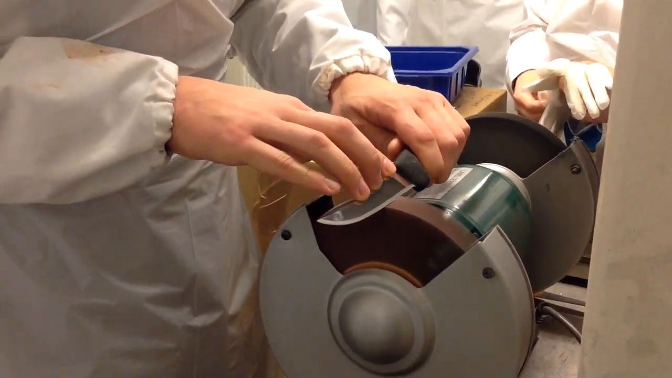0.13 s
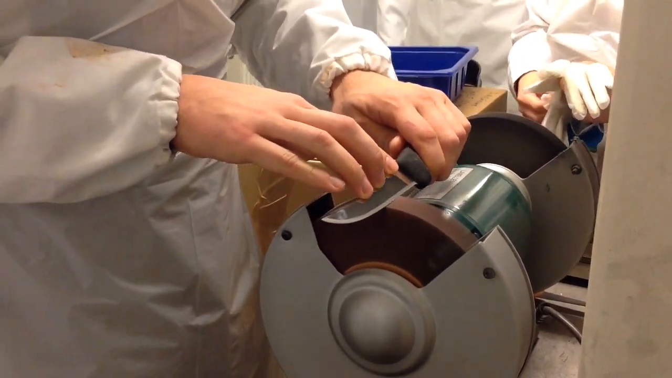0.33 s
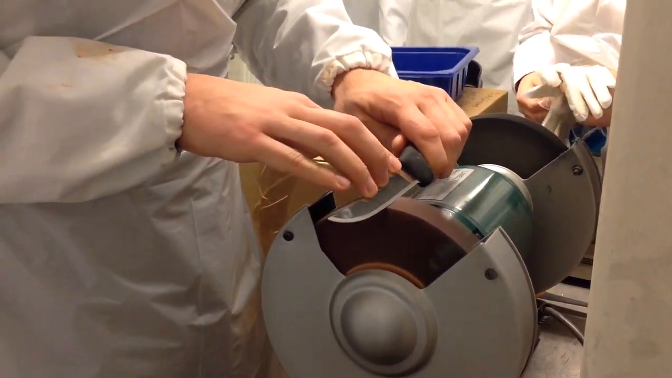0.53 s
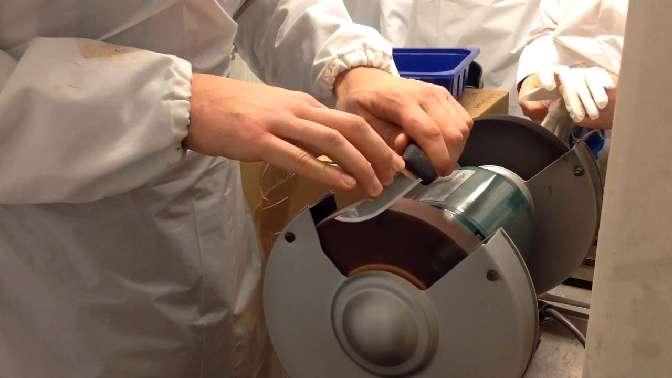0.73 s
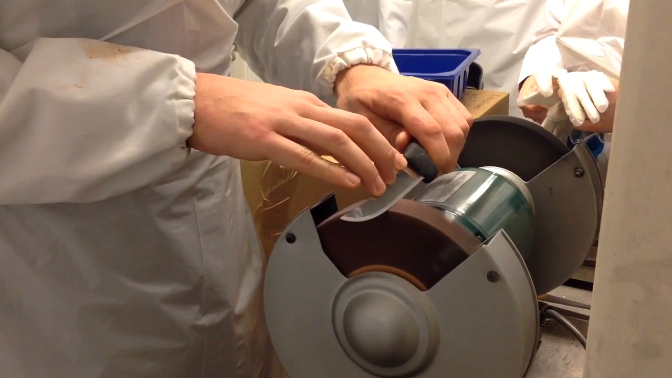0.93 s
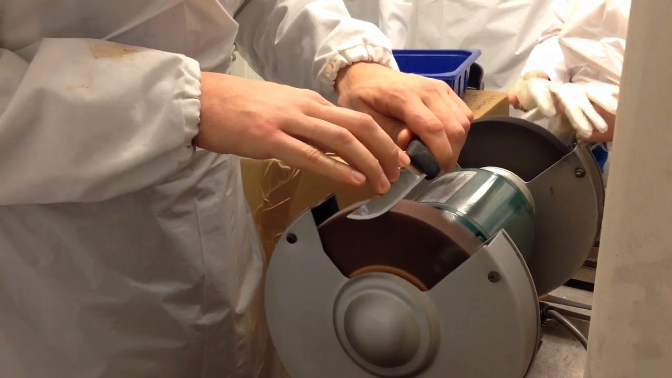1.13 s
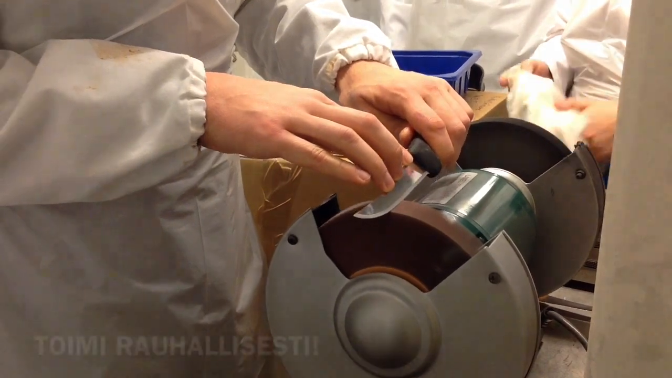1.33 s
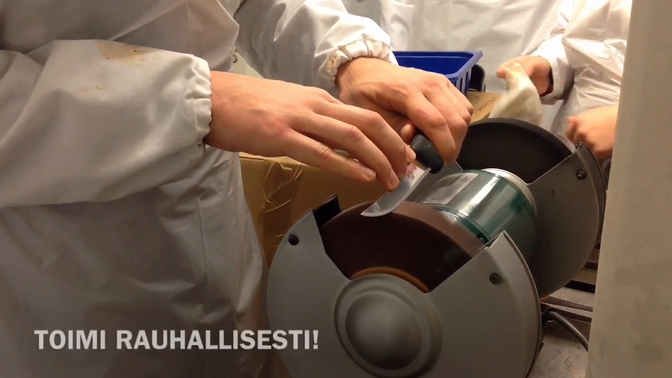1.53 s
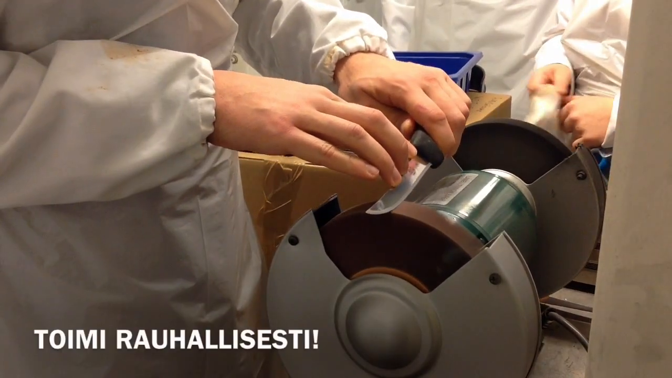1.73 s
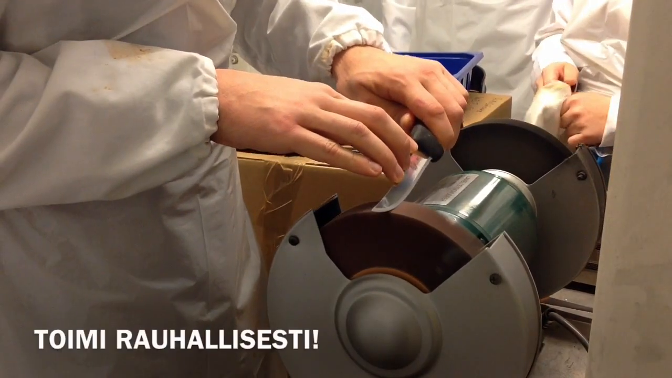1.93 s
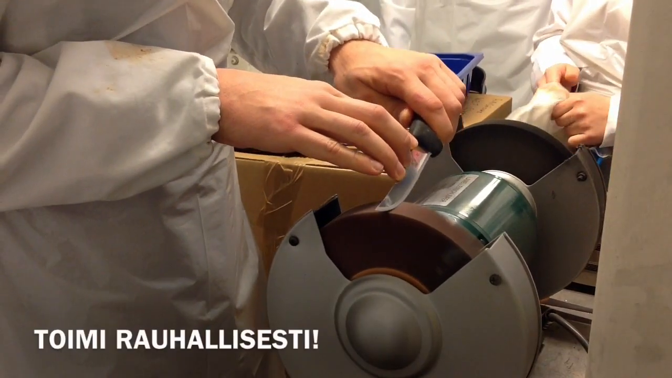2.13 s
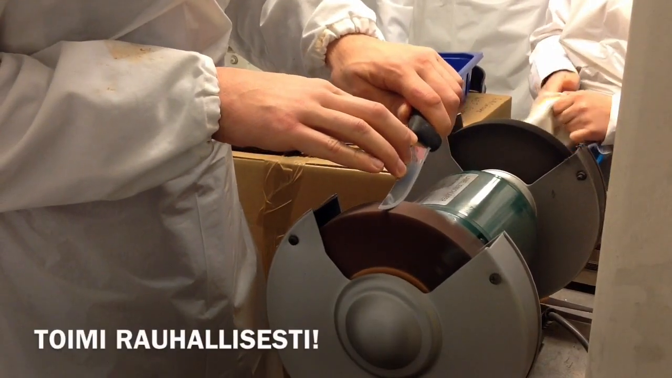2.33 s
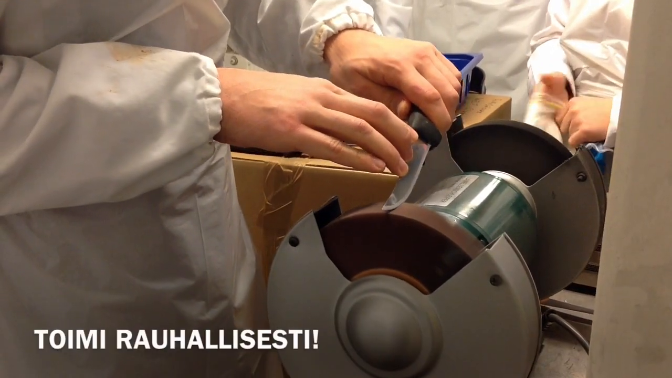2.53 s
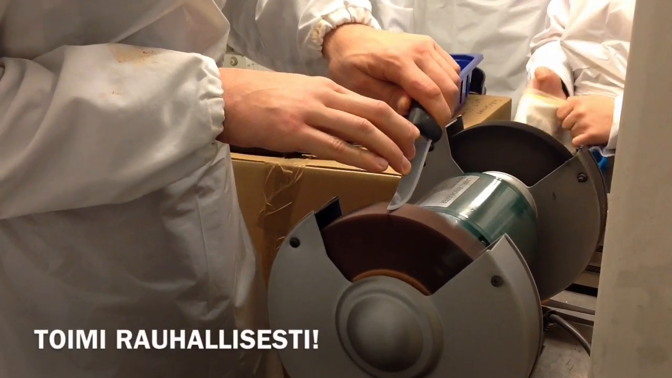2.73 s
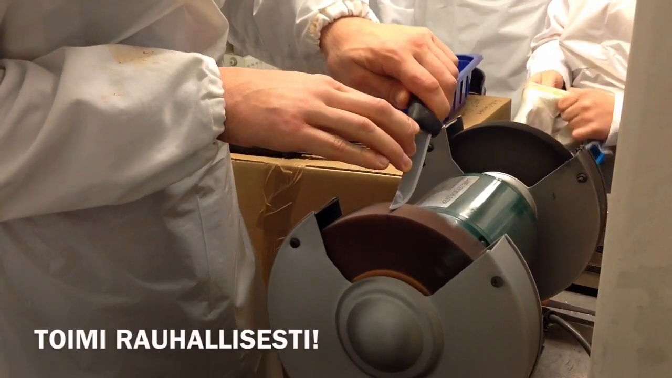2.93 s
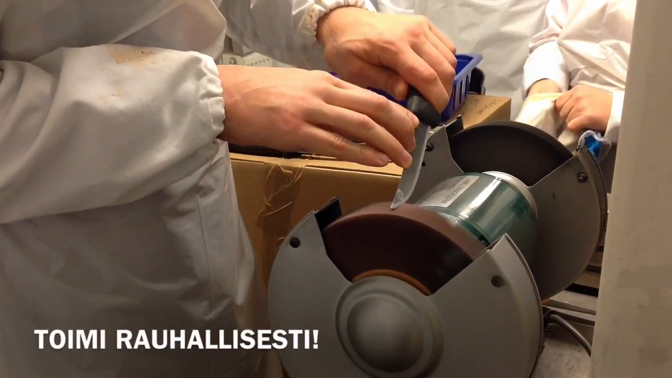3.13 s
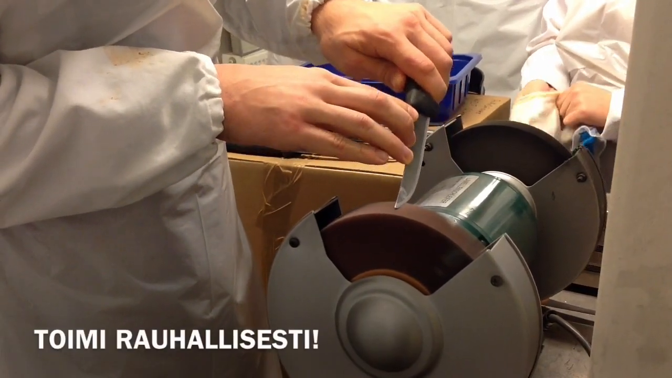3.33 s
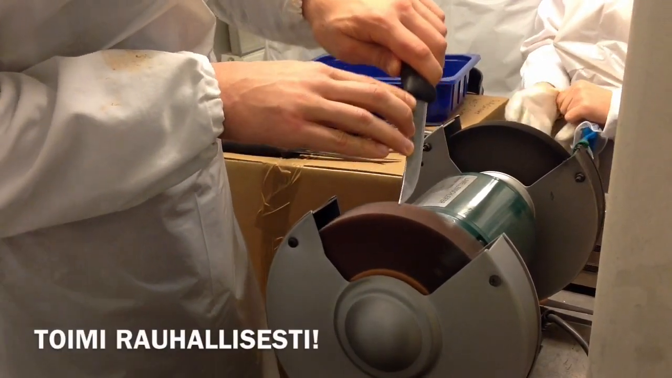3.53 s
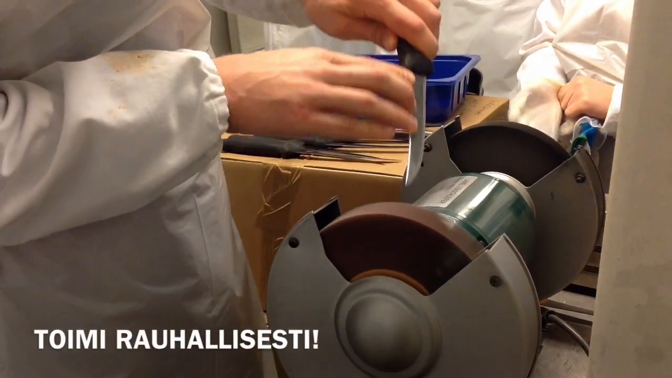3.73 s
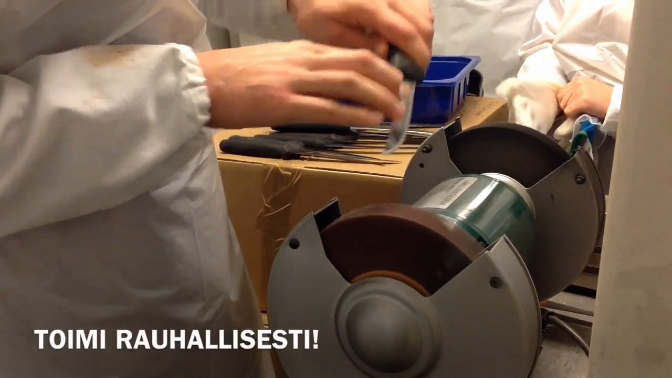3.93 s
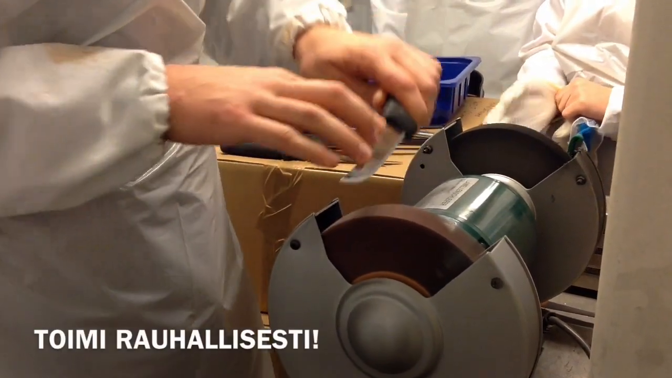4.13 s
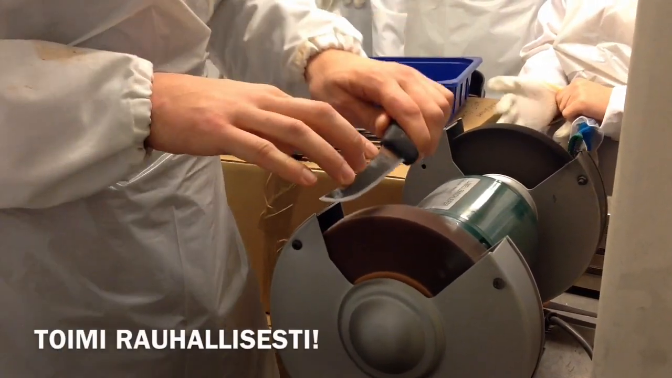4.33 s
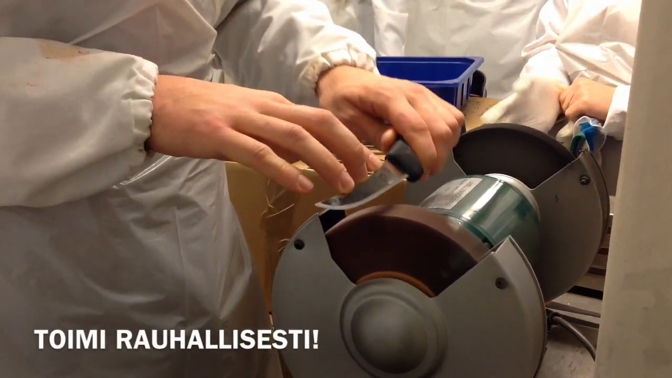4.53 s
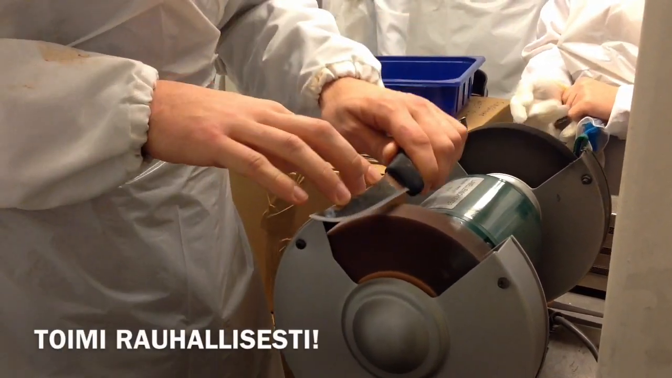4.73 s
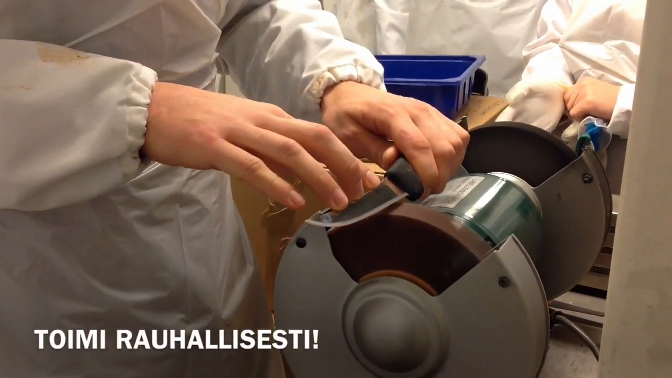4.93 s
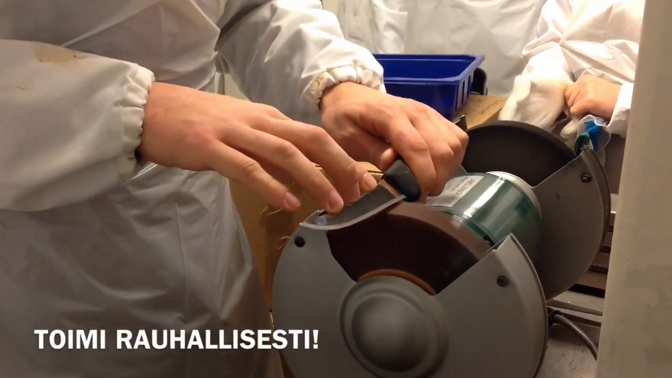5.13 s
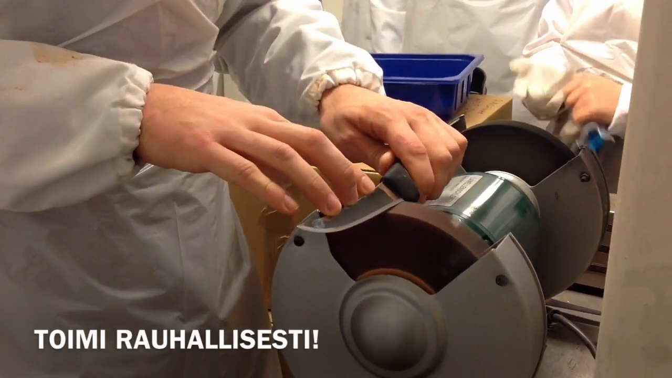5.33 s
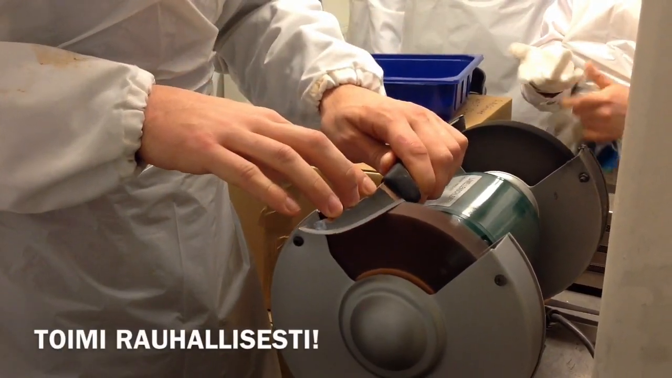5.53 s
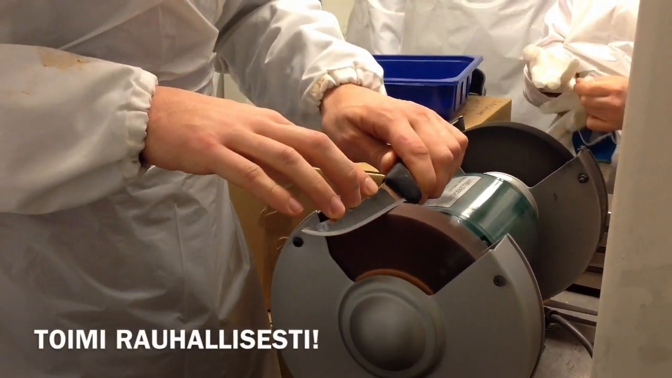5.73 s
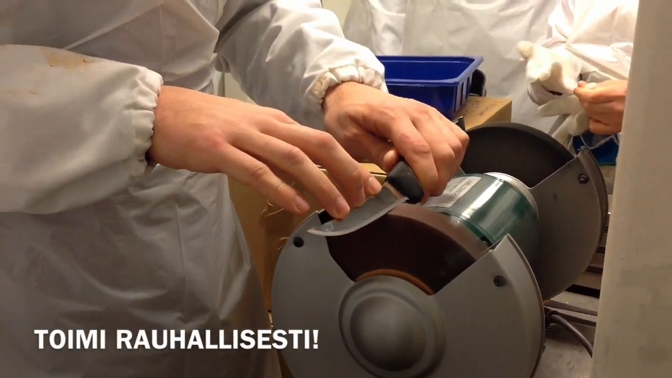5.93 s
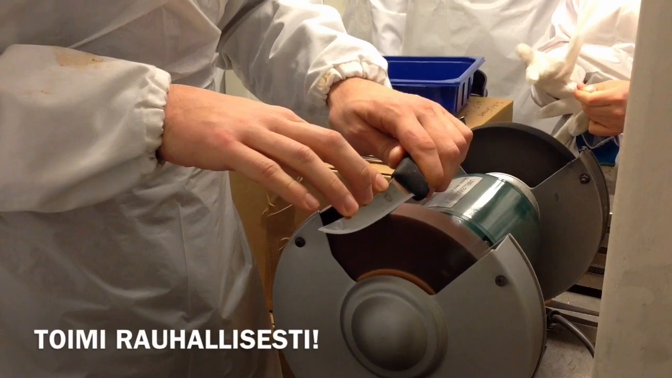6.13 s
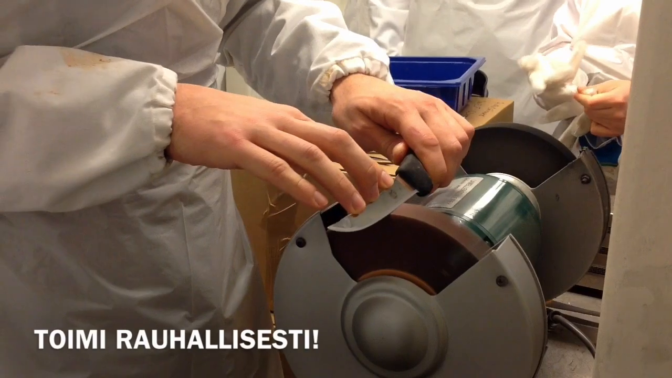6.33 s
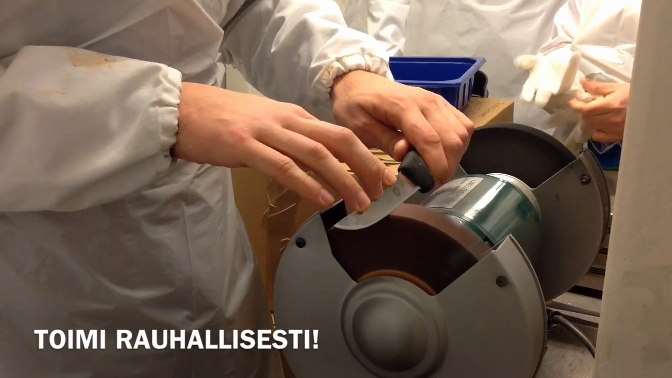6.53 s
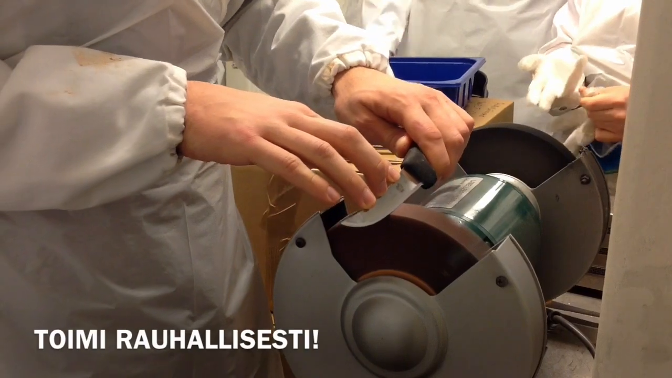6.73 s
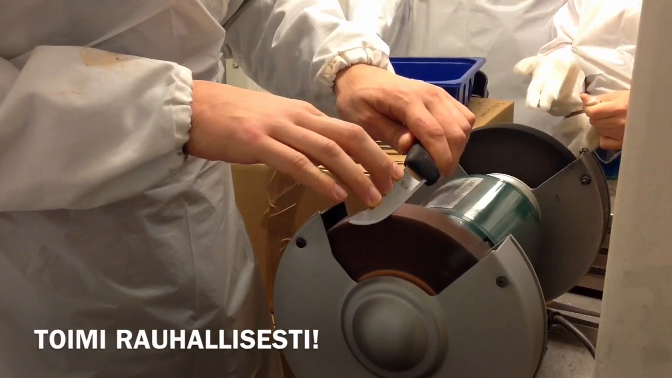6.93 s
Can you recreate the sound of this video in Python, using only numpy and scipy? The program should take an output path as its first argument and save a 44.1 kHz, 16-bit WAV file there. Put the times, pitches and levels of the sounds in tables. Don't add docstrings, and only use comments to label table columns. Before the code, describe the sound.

From 0 seconds a knife is already pressed to a rapidly spinning abrasive flap wheel. A shrill metallic whine near 3.2 kHz, with higher overtones that swell and fade, rides on a bright, dense grinding hiss. The grit has a fast once-per-turn flutter, and its colour shifts as the blade slides. Toward 3.6 seconds the hiss brightens at the tip, then the blade lifts at about 3.7 and contact vanishes almost instantly. Until about 5.3 seconds only the free-running machine remains: low motor hum, rushing wheel wind and a hollow sheet-metal resonance, swelling as the camera raises its gain. A light graze leads into a fast landing near 5.4 seconds. Shrill song and hiss return, the machine quickly drops behind, and the whine sags slightly in pitch with a rougher beating from 6.1. It ends near 7 seconds still grinding, close and dry indoors, with faint hiss and room rumble.

```python
import sys
import numpy as np
from scipy import signal
from scipy.fft import rfft, irfft, next_fast_len
from scipy.io import wavfile
from scipy.ndimage import uniform_filter1d, map_coordinates

SR = 44100
rng = np.random.default_rng(int(sys.argv[2]) if len(sys.argv) > 2 else 0)


def output_pcm(signal):
    pcm = np.clip(np.atleast_2d(signal).T, -1, 1) * 32767
    wavfile.write(sys.argv[1], SR, np.round(pcm).astype(np.int16))


def voltage_ratio(level):
    return 10 ** (np.asarray(level, float) / 20)


N = 307377
T = np.arange(N) / SR

LEAVES = 64
TOP_HZ = 17000
LIFT_S, TOUCH_S = 3.66, 5.368


def unit(x):
    return x / np.sqrt(np.mean(np.abs(x) ** 2) + 1e-20)


def along(points, hz):
    f, v = np.transpose(points)
    return np.interp(np.log(hz + 1), np.log(f + 1), v)


def curves(rows):
    s, *columns = np.transpose(rows)
    return [np.interp(T, s, column) for column in columns]


def wobble(rate):
    knots = rng.standard_normal(int(N * rate / SR) + 4)
    return map_coordinates(knots, [np.arange(N) * rate / SR])


def filtered(x, response):
    m = next_fast_len(N + 8192)
    hz = np.fft.rfftfreq(m, 1 / SR)
    return irfft(rfft(x, m) * response(hz), m)[..., :N]


def noise(response):
    return unit(filtered(rng.standard_normal(N), response))


def hiss():
    corner_hz = 6000
    return voltage_ratio(-45) * noise(lambda hz: (hz < TOP_HZ) * hz ** 2 / (hz ** 2 + corner_hz ** 2))


def room():
    # (frequency [Hz], density [dB per Hz])
    rumble = [(20, -40), (60, -29), (100, -14), (160, 10), (300, -6), (600, -62)]
    return voltage_ratio(-53) * noise(lambda hz: voltage_ratio(along(rumble, hz)))


def wind():
    # (frequency [Hz], density [dB per Hz])
    air = [(18, -84), (30, -50), (152, -19.5), (333, -7.5), (506, -10.5), (608, -11), (900, -11.5),
           (1140, -2.5), (1520, -16), (2560, -12.5), (3420, -20), (14000, -35.5), (15600, -44)]
    return voltage_ratio(-5) * noise(lambda hz: voltage_ratio(along(air, hz)))


def guard():
    # (frequency [Hz], width [Hz], level [dB])
    modes = [(326, 26, -11), (466, 26, -4), (609.3, 116, -1.5), (1065.5, 84, 1.5), (1160.6, 58, 3),
             (1401, 86, -8)]

    def response(hz):
        power = sum(voltage_ratio(db) ** 2 / (1 + (2 * (hz - centre) / width) ** 2) ** 2 for centre, width, db in modes)
        return np.sqrt(power)

    return voltage_ratio(-2.5) * noise(response)


def shaft(turns):
    # (multiple of the turning rate [1], level [dB])
    harmonics = [(3, -22.5), (4, -18.5), (5, -25), (6, -19.5), (7, -16.5), (8, -29), (36, -17.5)]
    swing_db = 2.2
    lines = 0
    for multiple, db in harmonics:
        level = voltage_ratio(db + swing_db * wobble(6))
        lines = lines + level * np.sin(2 * np.pi * round(multiple) * turns + 0.33 * wobble(4))
    return lines


def camera_gain():
    held_db, creep_db_per_s = -31.5, 0.95
    recover_db, recover_s = 5.5, 1.38
    clamped_db, clamp_time_s = -31.5, 0.27
    clamp_s = TOUCH_S + 0.12
    before = np.minimum(T, clamp_s)
    recovery = 1 - np.exp(-np.maximum(before - LIFT_S, 0) / recover_s)
    rising_db = held_db + creep_db_per_s * before + recover_db * recovery
    decay = np.exp(-np.maximum(T - clamp_s, 0) / clamp_time_s)
    return voltage_ratio(clamped_db + (rising_db - clamped_db) * decay)


def machine(turns):
    return camera_gain() * (wind() + guard() + shaft(turns))


def contact(graze_db, trail_db, early_s):
    gone = np.maximum(T - LIFT_S + early_s, 0)
    ahead = np.maximum(TOUCH_S - T, 0)
    leave = np.maximum(-600 * gone, np.minimum(trail_db, 0) - 200 * gone)
    land = np.maximum(-415 * ahead, np.minimum(graze_db, 0) - 110 * ahead)
    return voltage_ratio(np.maximum(leave, land))


def rim(turns, colour, renew):
    steps = 4096
    count = int(turns[-1]) + 3
    spin = turns[-1] * SR / N
    hz = np.arange(steps // 2 + 1) * spin
    drift = np.fft.fftfreq(count, 1 / spin)[:, None]
    keep = 1 / np.sqrt(renew(hz)) / (1 + (drift / renew(hz)) ** 2)
    phasor = np.exp(2j * np.pi * rng.random(keep.shape))
    z = keep * phasor * np.sqrt(rng.exponential(size=keep.shape))
    lines = np.fft.ifft(z, axis=0)
    lines = lines * np.abs(lines) ** -.25
    surface = irfft(colour(hz) * lines, steps)
    surface = np.hstack([surface, surface[:, :1]])
    return unit(map_coordinates(surface, [turns, turns % 1 * steps], order=1))


def blade(x, patchy_db):
    z = signal.stft(x, nperseg=1024)[2]
    field = uniform_filter1d(rng.standard_normal(z.shape), size=2, axis=0)
    field = uniform_filter1d(field, size=20, axis=1)
    field = uniform_filter1d(field, size=15, axis=1)
    return signal.istft(z * voltage_ratio(patchy_db * unit(field)), nperseg=1024)[1][:N]


def grind(turns, pressure_db, bright_db):
    # (frequency [Hz], density [dB per Hz])
    grit = [(300, -110), (900, -19), (1400, -5), (1780, -4.5), (2900, -6), (3200, -4), (3600, -2.5),
            (5500, 1), (6200, 5), (7500, 4.5), (10100, 3.5), (11500, 7.5), (12800, 4.7), (13250, -1.5),
            (14300, -0.5), (14800, 3.5), (15600, 0)]
    # (frequency [Hz], rate [per s])
    wear = [(1500, .15), (5000, .25), (8000, .5), (12000, .9), (15000, 1.2)]
    on = contact(graze_db=-24, trail_db=-9.5, early_s=0)
    tip_db = bright_db - 9 * (1 - on) ** 4
    edge_db = 0.33 * tip_db
    body_db = -4.5

    def colour(hz):
        return voltage_ratio(along(grit, hz)) * (hz < TOP_HZ)

    fresh = noise(colour)
    runout = rim(turns, lambda hz: (hz > 1) / (1 + (hz / 250) ** 2), lambda hz: 0.26 + 0 * hz)
    worn = rim(turns, colour, lambda hz: along(wear, hz))
    scrape = blade((worn + voltage_ratio(-8.5) * fresh) * voltage_ratio(.45 * runout), patchy_db=2.2)
    # (low [Hz], high [Hz], level [dB])
    parts = [(0, 3000, body_db - 10.0), (2870, 6550, body_db + 3.0), (6596, 9500, 0.15),
             (9330, 12800, edge_db + 0.27), (12720, SR, tip_db + 0.31)]
    total = 0
    for low, high, db in parts:
        band = filtered(scrape, lambda hz: (hz >= low) & (hz < high))
        total = total + voltage_ratio(db) * unit(band)
    return voltage_ratio(pressure_db) * on * total


def overtone_levels():
    # (overtone 1 [dB], overtone 2 [dB], overtone 3 [dB], overtone 4 [dB])
    resting = [
        (-20, -23.5, -28, -26.5),
        (-24.5, -23, -25.5, -26.5),
    ]
    # (time [s], half length [s], level [dB])
    crossings = [
        [(.75, 0.27, 1.5), (1.45, 0.19, 3), (1.77, 0.14, 4), (2.9, 0.39, 4.5), (3.6, 0.12, -5), (6.6, 0.13, 2)],
        [(.4, 0.16, 5), (.89, 0.049, -13), (1.46, 0.23, 6.5), (1.85, 0.092, 2), (2.32, 0.24, 6),
         (3.45, 0.18, -6), (5.84, 0.044, 4), (6.07, 0.19, 6), (6.58, 0.12, 5), (6.97, .1, 6.5)],
        [(.45, .25, 4), (1.42, 0.082, 7), (1.78, 0.14, 8.5), (2.27, .08, 7), (3.38, .17, 10), (5.44, .13, -15),
         (6.75, 0.42, 5.5)],
        [(.12, 0.3, 7.5), (.63, .06, 7), (1.0, .2, -8.5), (2.95, 0.64, 7.5), (5.62, 0.23, 13.5), (5.99, .08, 9),
         (6.58, 0.074, 8)],
    ]
    second = T > (LIFT_S + TOUCH_S) / 2
    levels = []
    for first_db, second_db, rows in zip(*resting, crossings):
        modes_db = sum(db * np.exp(-((T - s) / half) ** 2) for s, half, db in rows)
        levels.append(np.where(second, second_db, first_db) + modes_db)
    return levels


def song(turns, beat_db):
    def uneven(hz):
        return (hz > 1) / (1 + (hz / 130) ** 2)

    def slow(hz):
        return 0.92 + 0 * hz

    spacing, bite = rim(turns, uneven, slow), rim(turns, uneven, slow)
    angle = 2 * np.pi * turns
    tones = 0
    for k, level_db in enumerate(overtone_levels(), 1):
        phase = k * LEAVES * angle + 0.089 * (k - .7) * spacing + 2 * np.pi * rng.random()
        beat = voltage_ratio(beat_db - 1.6 * (k - 1.5)) * np.sin(phase - angle + 1.6 * (k - 1))
        on = contact(graze_db=5 - 8.9 * k, trail_db=2 - 9 * k, early_s=0.022)
        tone = (1 + 0.053 * (k - .7) * bite) * np.sin(phase) + beat
        tones = tones + voltage_ratio(level_db) * on * unit(tone)
    return tones


def scene():
    # (time [s], leaf passing rate [Hz])
    spin = [(0, 3157.7), (.15, 3158.1), (.4, 3160.6), (.8, 3160), (1.2, 3163), (1.45, 3162.4),
            (1.9, 3164.8), (2.25, 3162.5), (2.7, 3159.8), (3.15, 3163), (3.35, 3162), (3.45, 3163.2),
            (3.7, 3172), (4.5, 3178.5), (5.3, 3178.5), (5.64, 3173.9), (6.12, 3162.6), (6.96, 3157.6)]
    # (time [s], pressure [dB], brightness towards the tip [dB], once-a-turn beat [dB])
    strokes = [
        [(0, -21, 3, -14), (.85, -20, 0, -11.5), (1.04, -23, 3, -12), (1.2, -21.5, 2.5, -14.5),
         (1.9, -20.5, 2.5, -36), (2.25, -20.5, 3.5, -19), (2.75, -21.5, 2, -40), (3.33, -21, 1.5, -14),
         (3.62, -22.5, 11.5, -12)],
        [(5.36, -22.5, 7, -16), (5.46, -25.5, 4.5, -18), (5.54, -21.5, 7, -16), (5.64, -23.5, 8, -19),
         (5.93, -22.5, 7.5, -16), (6.1, -21, 4, -11), (6.36, -21.5, 4, -3.5), (6.85, -21, 0, -7.5),
         (6.97, -19.5, 0, -5)],
    ]
    turns = np.cumsum(curves(spin)[0]) / LEAVES / SR
    pressure_db, bright_db, beat_db = curves(np.vstack(strokes))
    mono = hiss() + room() + machine(turns)
    mono = mono + grind(turns, pressure_db, bright_db) + song(turns, beat_db)
    return np.array([mono, mono])


def starved(x, margin_db):
    hz, _, z = signal.stft(x, SR, nperseg=2048)
    band = uniform_filter1d(np.abs(z) ** 2, size=4, axis=0)
    band = uniform_filter1d(band, size=3, axis=1)
    around = uniform_filter1d(np.log(np.abs(band) + 1e-20), size=61, axis=0)
    weak = np.abs(band) < np.exp(around) * voltage_ratio(along(margin_db, hz))[:, None] ** 2
    return signal.istft(np.where(weak, .05 * z, z), SR, nperseg=2048)[1][:N]


def low_pass(x):
    return signal.sosfilt(signal.butter(12, 16370, fs=SR, output="sos"), x)


def record(dry):
    x = dry[0] / (1 + np.abs(dry[0] / 1.05) ** 8) ** (1 / 8)
    x = starved(x, margin_db=[(2500, -30), (3300, -6), (9000, -5), (13000, -3.5), (14500, -3.3)])
    x = filtered(x, lambda hz: voltage_ratio(-.3 * np.maximum(hz - 15270, 0)) / np.sqrt(1 + (60 / (hz + 1)) ** 4))
    mix = np.array([x, x])
    return low_pass(mix)


dry = scene()
out = record(dry)
output_pcm(out)
```